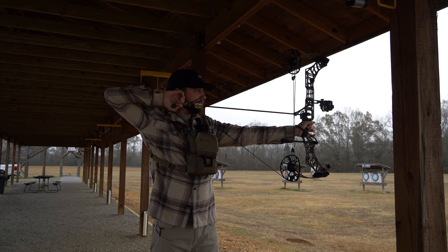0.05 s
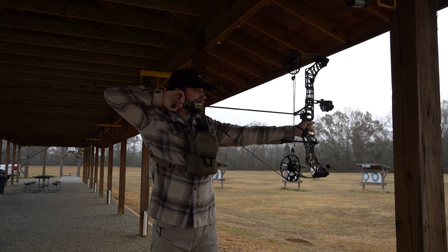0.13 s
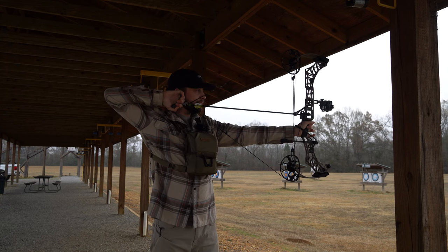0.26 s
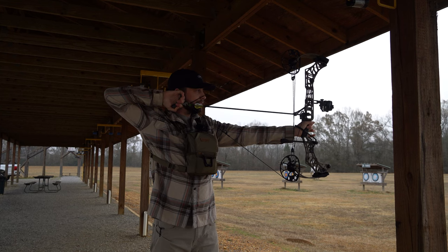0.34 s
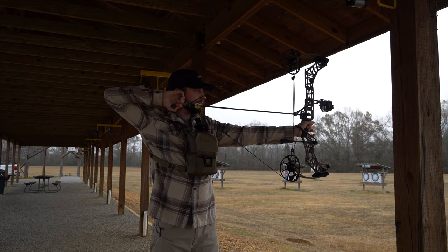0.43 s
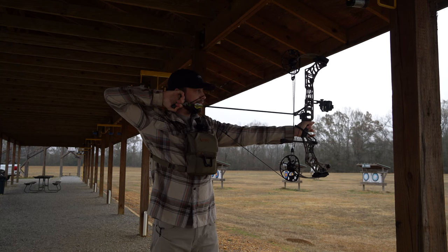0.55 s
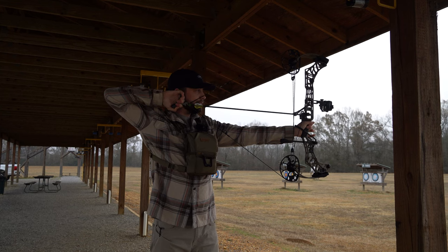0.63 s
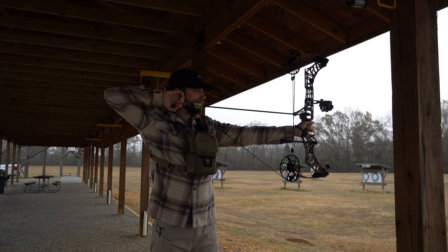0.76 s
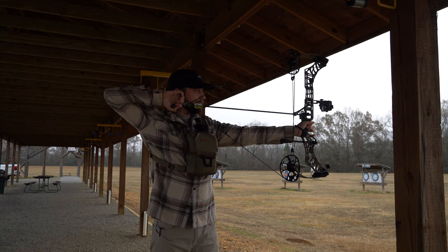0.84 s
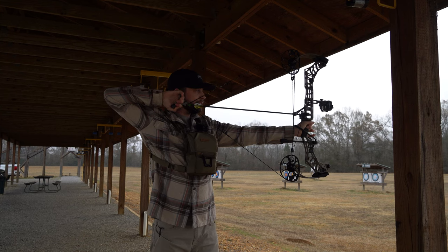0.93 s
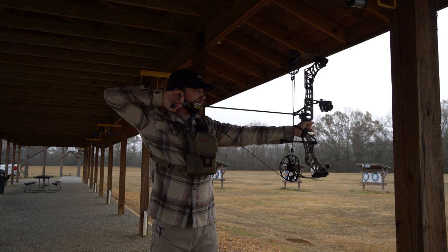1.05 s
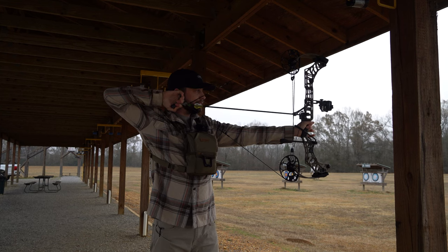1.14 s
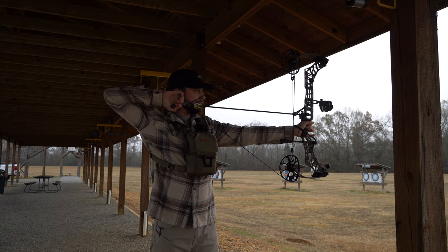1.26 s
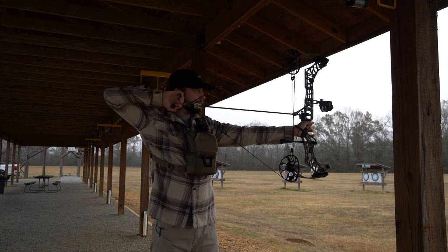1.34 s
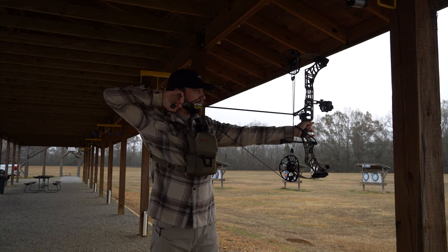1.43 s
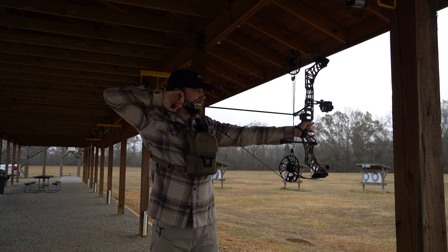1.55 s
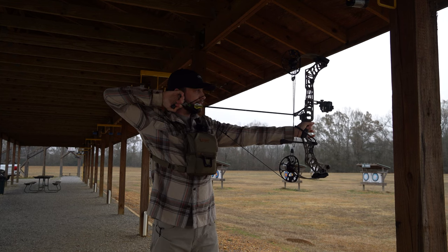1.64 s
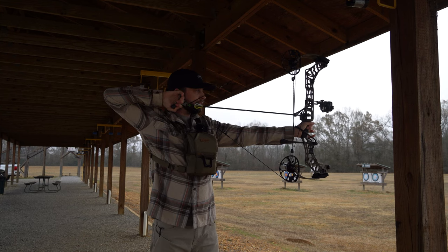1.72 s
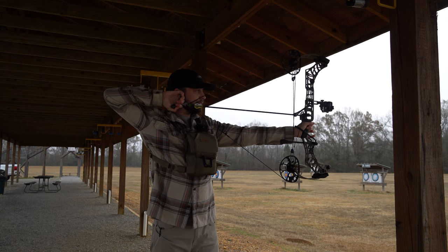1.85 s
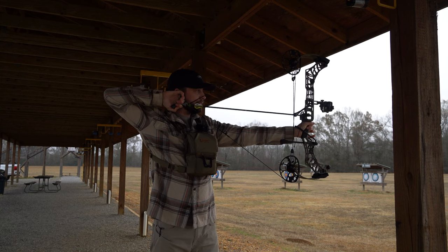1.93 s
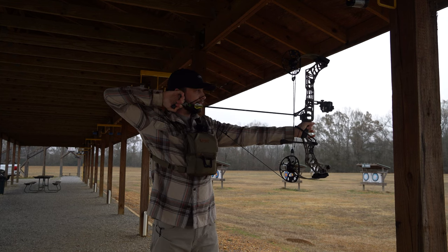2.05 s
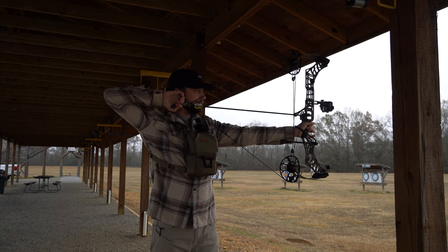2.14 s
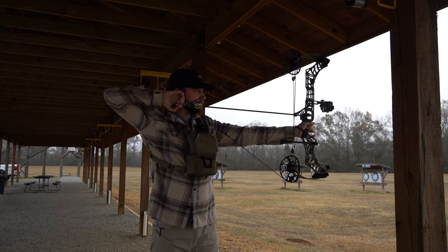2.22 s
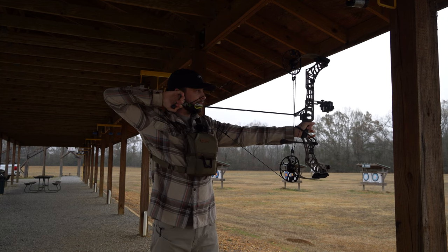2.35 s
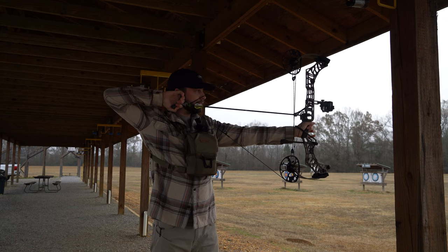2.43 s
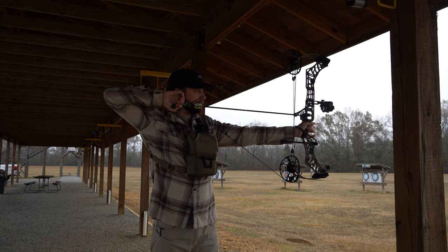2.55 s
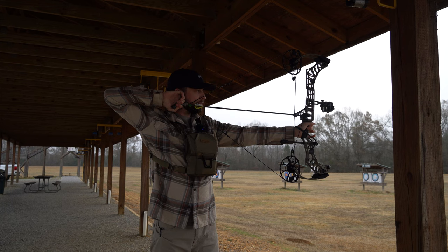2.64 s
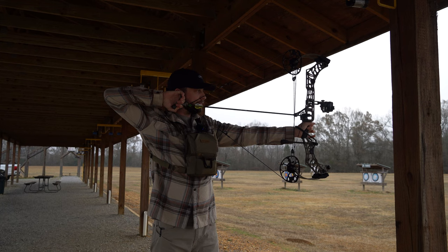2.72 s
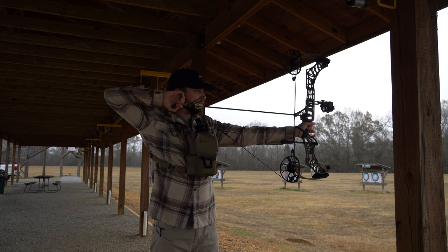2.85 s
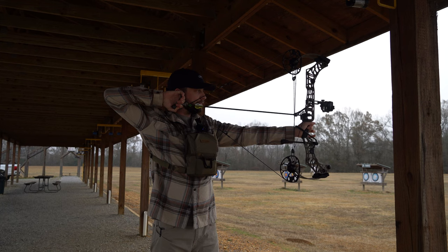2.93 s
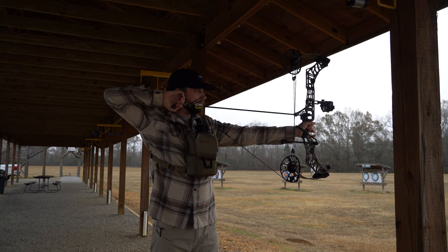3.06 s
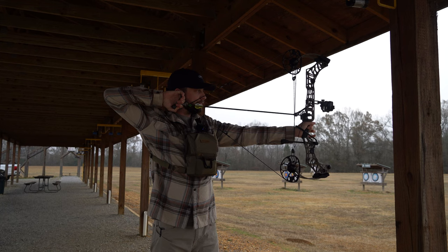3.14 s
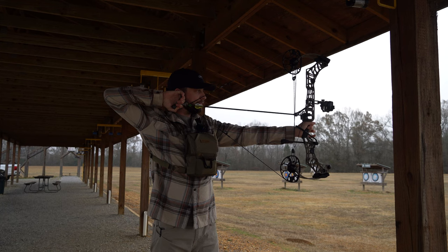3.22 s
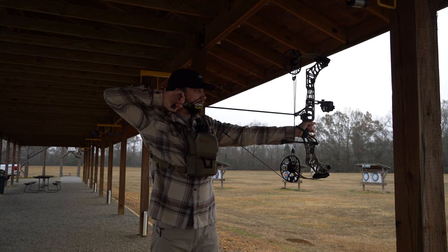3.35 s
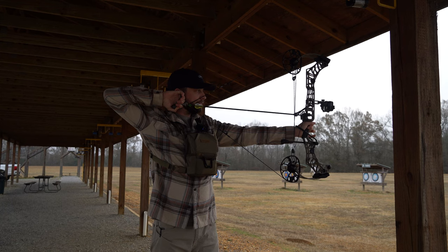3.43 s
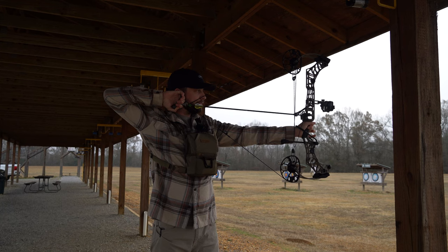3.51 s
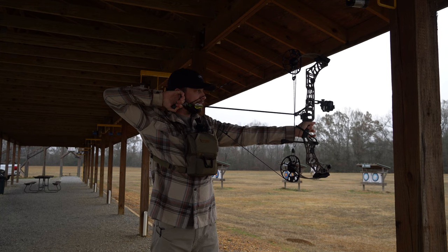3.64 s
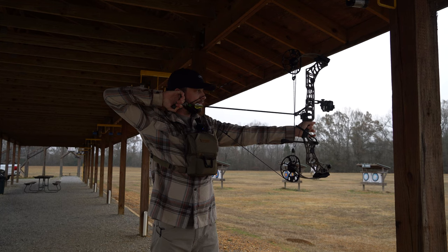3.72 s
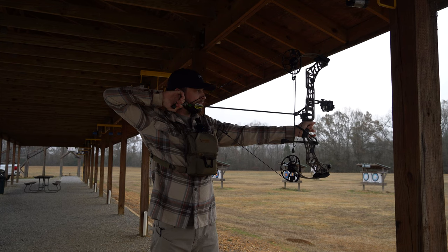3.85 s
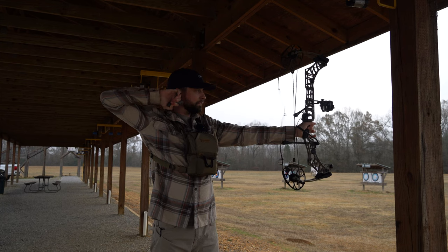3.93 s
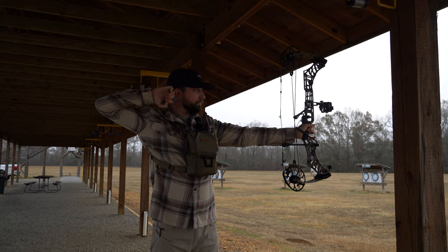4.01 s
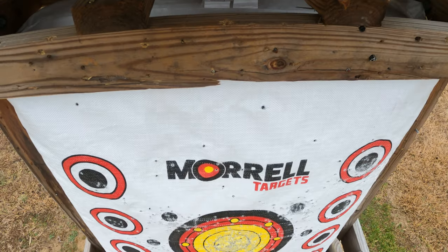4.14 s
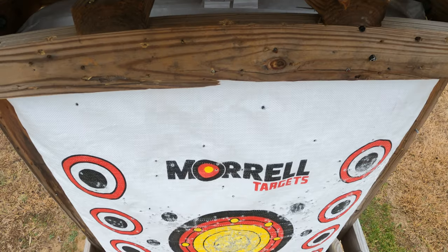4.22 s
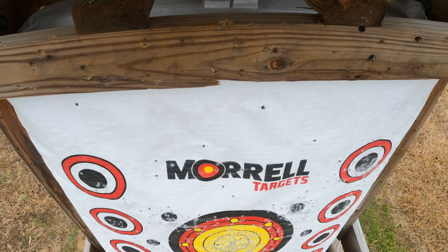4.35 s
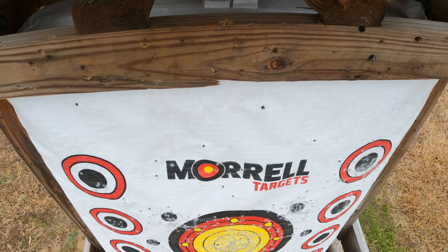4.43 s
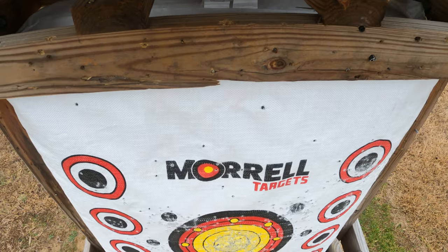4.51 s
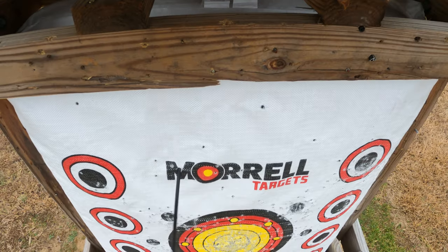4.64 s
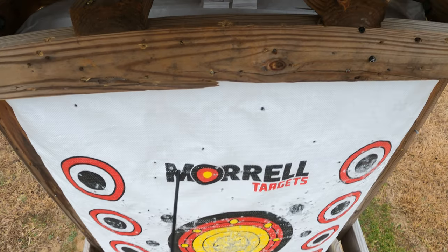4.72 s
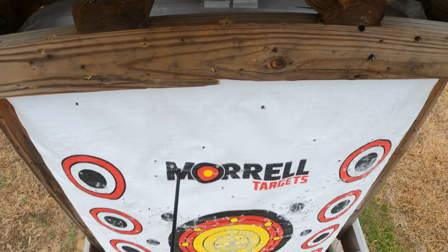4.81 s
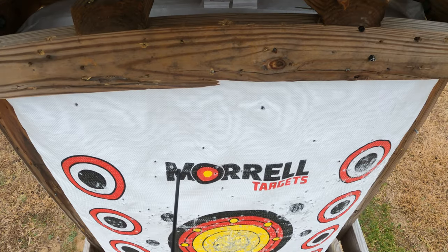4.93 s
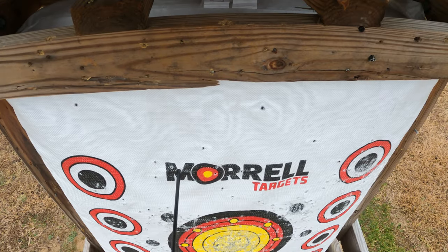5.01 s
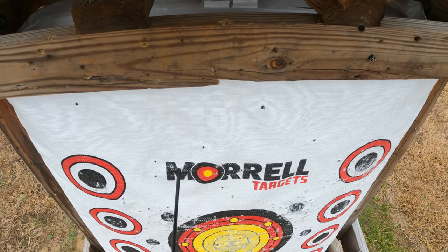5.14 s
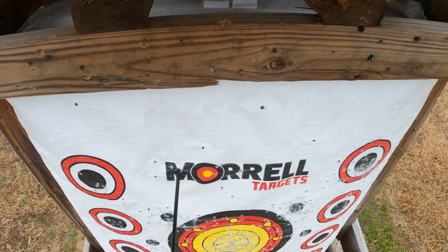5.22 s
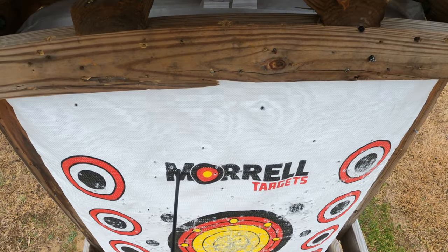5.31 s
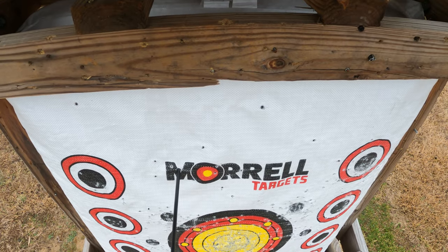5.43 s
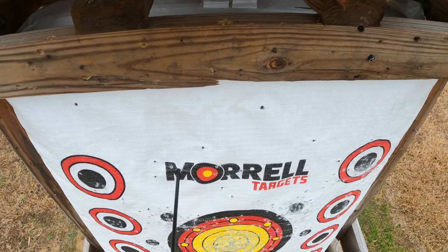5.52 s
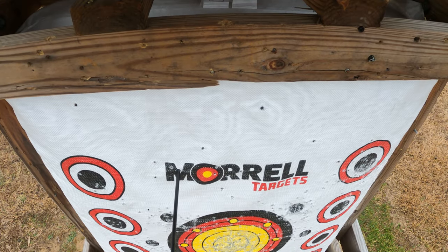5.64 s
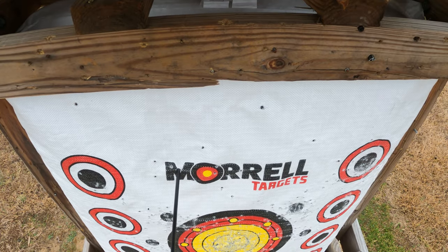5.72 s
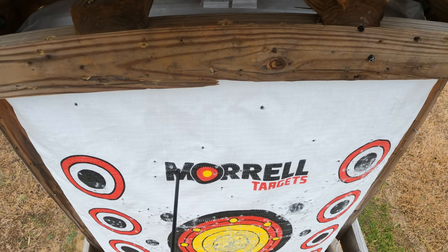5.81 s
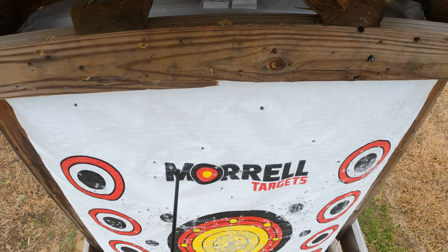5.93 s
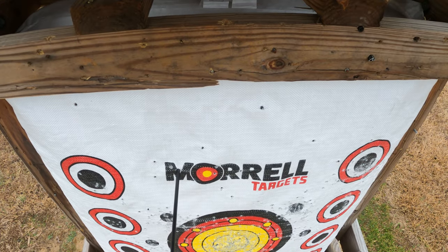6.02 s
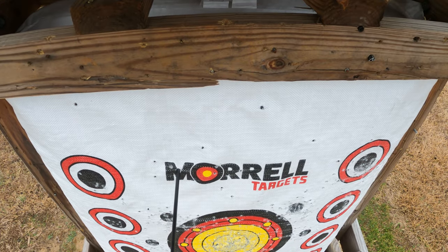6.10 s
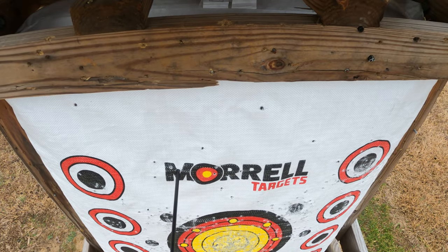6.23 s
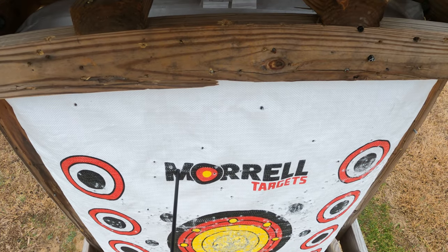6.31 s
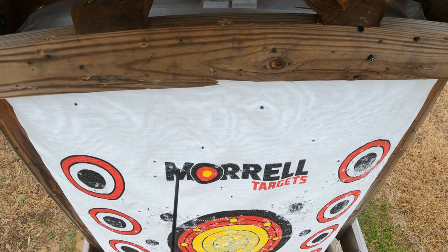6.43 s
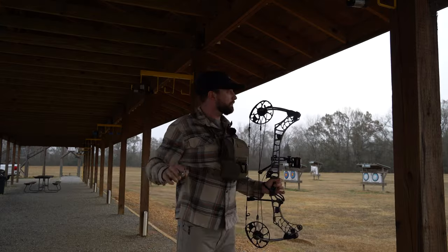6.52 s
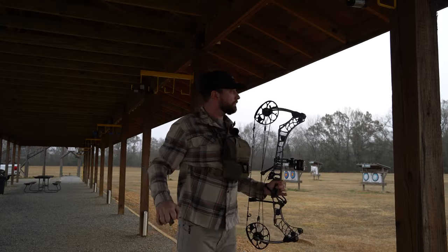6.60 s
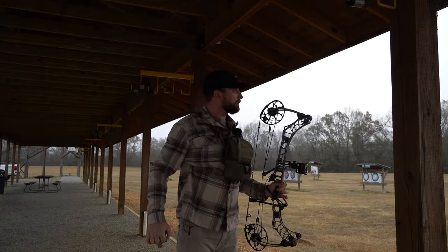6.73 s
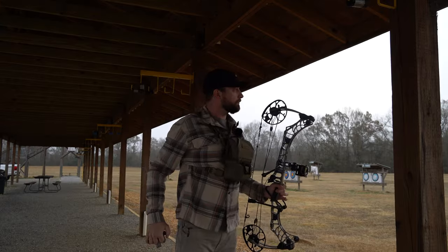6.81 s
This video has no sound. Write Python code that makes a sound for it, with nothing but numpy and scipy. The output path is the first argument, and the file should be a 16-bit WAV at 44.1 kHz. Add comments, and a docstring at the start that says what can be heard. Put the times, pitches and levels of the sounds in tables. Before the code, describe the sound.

Under an open shelter a compound bow snaps and rings; moments later an arrow hisses close and cracks loudly into a foam target, leaving ducked, recovering background.

```python
"""A compound bow is shot from under a wooden shelter at an outdoor range, over distant traffic and faint whistles.
After a tick at full draw, the release snaps, the string slams home and the bow rings: decaying noise and modes.
The hit returns faintly from down the field. A microphone at the target then hears the far shot, the arrow hissing
in and its crack into the foam; its gain control ducks and slowly recovers. Meanwhile cloth rustles and loose parts
rattle; last, a thin squeak, a dull bump and more faint whistles. Both microphones are mixed to mono."""
import sys
import numpy as np
from scipy import signal
from scipy.fft import rfft, irfft
from scipy.io import wavfile
from scipy.ndimage import uniform_filter1d

SR = 44100
rng = np.random.default_rng(int(sys.argv[2]) if len(sys.argv) > 2 else 0)


def master(y):
    """Save y as 16-bit WAV."""
    cut = np.clip(np.atleast_2d(y).T, -1, 1)
    pcm = np.round(cut * 32767)  # scale
    wavfile.write(sys.argv[1], SR, pcm.astype(np.int16))


N = 302702
TIME = np.arange(N) / SR  # seconds

# Spectrum of the string and limbs, for stroke and slam. Each row: frequency in Hz, relative gain in dB.
SLAM_COLOUR = [(40, -24), (100, -4), (230, 0), (420, 1), (620, -5.5), (850, -3), (1300, -5.5), (2000, -12),
               (3000, -21), (7000, -20), (10000, -28.5), (16000, -38)]


def undb(db):
    """Decibels are logarithmic: 20 dB is a tenfold amplitude."""
    return 10 ** (np.asarray(db) / 20)


def curve(rows, axis=1):
    """Linear interpolation joins one column of a table in time."""
    rows = np.array(rows)
    return np.interp(TIME, rows[:, 0], rows[:, axis])


def fade(t, t60):
    """Exponential damping: the amplitude falls by 60 dB in t60 seconds."""
    return np.exp(-np.log(1000) * t / t60)


def swell(start_s, length_s, rise, fall):
    """Linear attack, hold and release; rise and fall are shares of the length."""
    age = (TIME - start_s) / length_s
    return np.clip(np.minimum(age / rise, (1 - age) / fall), 0, 1)


def white_noise():
    """Independent Gaussian samples hold equal power at all frequencies."""
    return rng.standard_normal(N)


def colour(x, points):
    """Minimum-phase filter through (Hz, dB) points, of unit energy so that white noise keeps its level."""
    size = 2 ** 13
    hz, db = np.transpose(points)
    bins_hz = np.arange(size // 2 + 1) * SR / size
    gain = undb(np.interp(np.log(bins_hz + 1), np.log(hz), db))
    # folding the cepstrum onto positive times makes the response causal
    cepstrum = irfft(np.log(gain))
    cepstrum[1:size // 2] *= 2
    cepstrum[size // 2 + 1:] = 0
    response = irfft(np.exp(rfft(cepstrum)))
    return signal.oaconvolve(x, response / np.linalg.norm(response))[:N]


def walk(rate):
    """Low-passed random steps, about rate of them per second, with unit standard deviation."""
    k = int(SR / rate)
    steps = np.repeat(rng.standard_normal(N // k + 1), k)[:N]
    smooth = uniform_filter1d(uniform_filter1d(steps, k), k)
    return smooth / smooth.std()


def wavering_tone(pitch):
    """Frequency modulation: the phase is the running sum of the pitch in Hz."""
    return np.sin(2 * np.pi * np.cumsum(pitch) / SR)


def bursts(rows, points):
    """Impact noise: each contact is a dense crackle of equal clicks under exponential damping."""
    out, t = np.zeros(N), TIME[:SR // 2]
    for s, db, t60 in rows:
        start = int(s * SR)
        clicks = np.sign(rng.standard_normal(len(t)))
        out[start:start + len(t)] += undb(db) * fade(t, t60) * clicks
    return colour(out, points)


def ring(at_s, modes, db, push_s):
    """Modal superposition: damped sines of alternating polarity build up under a push of time constant push_s."""
    out, t, start = np.zeros(N), TIME[:SR // 2], int(at_s * SR)
    tone = np.zeros(len(t))
    for k, (hz, mode_db, t60) in enumerate(modes):
        tone += (-1) ** k * undb(mode_db) * fade(t, t60) * np.sin(2 * np.pi * hz * t)
    out[start:start + len(t)] = undb(db) * tone * (1 - np.exp(-t / push_s))
    return out


def knock(at_s, db, spread, points):
    """All-pass dispersion: the struck body holds some bands of one sharp blow back briefly."""
    click = np.zeros(N)
    click[int(at_s * SR)] = undb(db)
    for hz, width in spread:
        # subtracting a resonance twice turns the phase and keeps the spectrum
        resonance = signal.lfilter(*signal.iirpeak(hz, hz / width, fs=SR), click + 1e-18)
        click = click - 2 * resonance
    return colour(click, points)


def whistles(rows):
    """Frequency modulation: fast random scatter turns a gliding tone into a hissing trill."""
    out = np.zeros(N)
    for s, length, hz, glide, scatter, db, rise in rows:
        pitch = hz + glide * np.clip(TIME - s, 0, length) + scatter * walk(1100)
        tone = wavering_tone(pitch) * undb(2.5 * walk(120))
        out += undb(db) * tone * swell(s, length, rise=rise, fall=.4)
    return out


def traffic(points, low_db, high_db, split_hz):
    """Band splitting of distant road noise: engine rumble and tyre roar waver independently."""
    noise = colour(white_noise(), points)
    low_pass = signal.butter(2, split_hz, fs=SR, output="sos")
    rumble = signal.sosfiltfilt(low_pass, noise)
    roar = noise - rumble
    return rumble * undb(low_db * walk(14)) + roar * undb(high_db * walk(5.01))


def shelter_traffic():
    """Broadband background under the roof, its level drifting steadily down."""
    # Each row: frequency in Hz, relative gain in dB.
    air_colour = [(15, -60), (25, -35), (78, -7.5), (108, -1.5), (170, -6), (223, -13), (263, -13),
                  (293, -19.5), (354, -14), (591, -11), (720, -8.5), (988, -7.5), (1100, -12),
                  (1230, -12.5), (1650, -24), (3080, -34.5), (7500, -52.5), (12500, -58.5), (16000, -70)]
    start_db, drift_db_per_s = -53.5, -0.18
    level = undb(start_db + drift_db_per_s * TIME)
    return traffic(air_colour, low_db=1.2, high_db=0.5, split_hz=210) * level


def birds():
    """Faint frequency-modulated whistles and trills, likely birds in the tree line."""
    # Each row: start in seconds, length in seconds, pitch in Hz, glide in Hz per second,
    # pitch scatter in Hz, mean level in dB, share of the length spent rising.
    notes = [(.19, .06, 3200, 0, 200, -75, .1), (.34, .08, 4570, 0, 30, -83, .1),
             (1.005, 0.061, 4700, 3000, 220, -75, .2), (6.56, .13, 4490, 700, 55, -76, .15),
             (6.69, .24, 4200, -3000, 130, -75, .06)]
    return whistles(notes)


def tick():
    """Modal ringing of a small tick at full draw."""
    # Each row: frequency in Hz, relative level in dB, decay by 60 dB in seconds.
    tick_modes = [(4280, 0, 0.018), (4550, -8, .015), (5900, -17, .012), (9500, -10, 0.012),
                  (13800, -28, .012)]
    return ring(0.631, tick_modes, db=-42, push_s=0.00064)


def far_engine():
    """Filtered low-frequency noise: a far engine swells into the traffic and fades."""
    # Each row: frequency in Hz, relative gain in dB.
    rumble_colour = [(20, -30), (55, -12.5), (90, 0.5), (125, -1), (190, -18), (500, -50), (2000, -80)]
    return undb(-61.5) * colour(white_noise(), rumble_colour) * swell(2.8, 4.5, rise=.12, fall=.15)


def release():
    """Impact noise of the release jaw and cams, then of the arrow rest as it drops."""
    # Release jaw and cams. Each row: start in seconds, level in dB, decay by 60 dB in seconds.
    snaps = [(3.9808, -37.5, .01), (3.9823, -15.5, .006), (3.9832, -7.5, .007), (3.9852, -18, .01),
             (3.9864, -15, .006), (3.992, -35, .03), (4.0068, -34, .03)]
    # Each row: frequency in Hz, relative gain in dB.
    snap_colour = [(40, -18), (100, -5), (328, -5.5), (558, -13.5), (1280, -14.5), (1480, -12.5),
                   (3200, -11), (4050, -2), (5100, -6.5), (5850, -11), (6350, -1), (7400, -1), (8640, -13),
                   (9410, -4.5), (10700, -17), (14100, -13), (16000, -25)]
    # Arrow rest. Each row: start in seconds, level in dB, decay by 60 dB in seconds.
    rest_clicks = [(3.993, -21.5, .01), (3.9958, -32, .04)]
    # Each row: frequency in Hz, relative gain in dB.
    rest_colour = [(1000, -25), (3000, -11), (5200, -12), (7300, 1), (9400, 0), (11000, -8), (14000, -8),
                   (16000, -20)]
    return bursts(snaps, snap_colour) + bursts(rest_clicks, rest_colour)


def string_stroke():
    """Flow noise: the string whooshes forward for 33 ms."""
    return undb(-50) * colour(white_noise(), SLAM_COLOUR) * swell(3.984, 0.033, rise=.15, fall=.15)


def string_slam():
    """Impact and resonance: the string hits its stop, the limbs rebound and the bow's modes ring."""
    # Each row: start in seconds, level in dB, decay by 60 dB in seconds.
    slams = [(4.007, -32, .03), (4.0108, -18.5, .025), (4.0185, -21.5, 0.04), (4.03, -34, .14)]
    # Bands that the limbs hold back briefly. Each row: centre in Hz, width in Hz.
    limb_spread = [(300, 400), (750, 600), (1500, 900)]
    # Riser, limbs and string. Each row: frequency in Hz, relative level in dB, decay by 60 dB in seconds.
    bow_modes = [(125, -17, .05), (254, 13, 0.025), (370.4, 1.5, .15), (412, -4.5, 0.14), (440, 5, .035),
                 (549, -4.5, .14), (657, -7, .1), (700, -5, 0.13), (804, -6.5, .12), (956, -11, .16),
                 (1157, -11, .15), (1270, -11, .12), (1450, -3, .042), (1600, -16, .15), (1873, -7.5, 0.19),
                 (1935, -9, .06), (2134, -13, .1), (2363, -22, .17), (4312, -24, .15), (5076, -23, .13),
                 (7047, -18.5, .12)]
    blow = knock(4.0112, 1.5, limb_spread, SLAM_COLOUR)
    return blow + bursts(slams, SLAM_COLOUR) + ring(4.0118, bow_modes, db=-24.5, push_s=.0015)


def fittings():
    """Sympathetic vibration: after the slam, cables and fittings buzz and the metal rings."""
    # Each row: start in seconds, level in dB, decay by 60 dB in seconds.
    buzzes = [(4.0112, -27, .02), (4.015, -23, .016), (4.021, -36, .145)]
    # Each row: frequency in Hz, relative gain in dB.
    buzz_colour = [(1500, -22), (2800, -4), (4800, -4.5), (5500, -6), (6250, -2.5), (7200, -7), (9000, -14),
                   (9900, -10), (11000, -19), (13000, -18), (16000, -30)]
    # Metal on the riser. Each row: frequency in Hz, relative level in dB, decay by 60 dB in seconds.
    fitting_modes = [(6140, 2, 0.031), (6428, -12, .08), (7930, -18, .08), (9730, -19, .08)]
    return bursts(buzzes, buzz_colour) + ring(4.0142, fitting_modes, db=-21.5, push_s=.0006)


def soft_hiss():
    """Filtered noise: a faint mid-treble hiss swells and fades before the hit."""
    # Each row: frequency in Hz, relative gain in dB.
    hiss_colour = [(1000, -25), (2400, -5), (3400, 0), (5200, -6), (7000, -22), (12000, -45)]
    return undb(-52) * colour(white_noise(), hiss_colour) * swell(4.0, .7, rise=.3, fall=.5)


def cloth():
    """Friction noise: the archer's clothes rub out a grainy hiss as he lowers the bow."""
    # Each row: start in seconds, length in seconds, level in dB, centre in Hz,
    # added fall-off from the centre in dB per octave, graininess in dB.
    rustles = [(4.02, .25, -71.5, 4500, 4, 2), (4.7, 0.44, -72, 6500, 3, 1.5),
               (4.81, 0.38, -67, 2000, 7, 2), (4.97, .52, -74.5, 8000, 7, 1),
               (5.11, 0.21, -74.5, 9000, 40, 1.5), (6.339, .04, -68, 5500, 6, 2),
               (6.592, .016, -78, 9000, 5, 2), (6.708, 0.29, -67, 10000, 6, 1)]
    # Each row: frequency in Hz, relative gain in dB before the added fall-off.
    rustle_colour = [(1000, -13), (2500, -3.5), (4500, 7), (6500, -3.5), (9000, -4.5), (12000, -15),
                     (16000, -30)]
    out = np.zeros(N)
    for s, length, db, centre, falloff, grain in rustles:
        points = [(hz, g - falloff * abs(np.log2(hz / centre))) for hz, g in rustle_colour]
        rub = white_noise() * undb(grain * walk(110))
        out += undb(db) * colour(rub, points) * swell(s, length, rise=.3, fall=0.37)
    return out


def field_traffic():
    """Broadband background out at the target, with wavering rumble and roar."""
    # Each row: frequency in Hz, relative gain in dB.
    air_colour = [(25, -25), (55, -10), (90, 2), (122, 5), (165, -2.5), (300, -8), (500, -9), (1000, -9),
                  (1700, -10.3), (2400, -20.5), (3600, -25.5), (5500, -38), (8000, -53), (12500, -66),
                  (15000, -80)]
    return undb(-37.5) * traffic(air_colour, low_db=1.5, high_db=0.62, split_hz=250)


def far_hit():
    """Impact and resonance from across the field: crack, scatter, weak echo and the stand's boom."""
    # Each row: start in seconds, level in dB, decay by 60 dB in seconds.
    hits = [(4.2957, -16.5, 0.0085), (4.2969, -24, 0.0073), (4.299, -35, 0.13), (4.3173, -32, .006)]
    # Each row: frequency in Hz, relative gain in dB.
    hit_colour = [(100, -7.5), (230, 3), (370, -2), (560, 5.5), (780, -3), (1040, 4), (1300, -2), (1800, 3),
                  (3100, -7.5), (4800, -1.5), (7000, -11), (10000, -26), (16000, -37)]
    # Wooden stand. Each row: frequency in Hz, relative level in dB, decay by 60 dB in seconds.
    stand_modes = [(124, -2.5, .065), (234.6, 1.5, 0.043), (571, -2, .06), (1030, -9.5, .09),
                   (2288, -19, .09)]
    return bursts(hits, hit_colour) + ring(4.2972, stand_modes, db=-24, push_s=.0006)


def far_shot():
    """Impact noise of the release and the slam, heard from the target."""
    # Each row: start in seconds, level in dB, decay by 60 dB in seconds.
    shots = [(4.513, -34, 0.078), (4.5385, -29, .04), (4.5415, -24.5, 0.053), (4.556, -36.5, .26)]
    # Each row: frequency in Hz, relative gain in dB.
    shot_colour = [(150, -6.5), (340, 4), (530, 9), (750, -2), (1150, 4), (1500, -2.5), (1960, 0.5),
                   (4000, -7), (6300, -7.5), (9000, -31.5), (12000, -19.5), (14500, -54.5)]
    return bursts(shots, shot_colour)


def arrow(pass_s, stop_s, speed, miss_m, hiss_db, flutter_db):
    """Distance law: vane hiss grows with nearness; flutter and tones grow more steeply, until the foam stops them."""
    # Each row: frequency in Hz, relative gain in dB.
    vane_hiss = [(60, -25), (200, -13), (700, -7), (1500, -2), (2100, 0), (3400, 1), (4400, 0.5),
                 (5400, -3), (6500, -8.5), (8500, -15), (9400, -21), (10500, -17.5), (12300, -17),
                 (13200, -27), (14000, -52)]
    # Each row: frequency in Hz, relative gain in dB.
    vane_flutter = [(20, -45), (150, -26.5), (230, -6), (370, 2), (590, -2), (700, -0.5), (830, -2.5),
                    (1000, -9.5), (2500, -38), (16000, -65)]
    # Unsteady narrow tones in the arrow's approach, heard only close up.
    # Each row: pitch in Hz, pitch scatter in Hz, level in dB at the nearest point.
    approach_tones = [(228, 8, -17.5), (510, 15, -19), (620, 14.9, -21), (711, 12, -13), (817, 20, -20),
                      (1280, 19, -27), (1820, 20, -28), (2110, 20, -23), (4365, 30, -24.5),
                      (4645, 30, -26.5), (5025, 30, -25), (7100, 50, -39)]
    # Whistles on the way in. Each row: start in seconds, length in seconds, pitch in Hz,
    # glide in Hz per second, pitch scatter in Hz, mean level in dB, share of the length spent rising.
    flight_whistles = [(4.622, .075, 2850, 27000, 420, -45.5, 0.2), (4.58, .12, 6600, 0, 70, -57, .5)]
    # Vanes flap just before the hit. Each row: start in seconds, level in dB, decay by 60 dB in seconds.
    vane_flaps = [(4.7048, -19, .014)]

    # speed in metres per second; nearness is 1 at the closest point
    nearness = miss_m / np.hypot(miss_m, speed * (TIME - pass_s))
    fade_in = np.clip((TIME - 4.55) / .1, 0, 1)
    flying = fade_in * fade(np.maximum(TIME - stop_s, 0), .008)
    close = flying * nearness ** 2.7

    rush = white_noise() * undb(1.5 * walk(300)) * flying * nearness ** 1.42
    hiss = undb(hiss_db) * colour(rush, vane_hiss)
    flutter = undb(flutter_db) * colour(np.sign(white_noise()) * close, vane_flutter)
    tones = np.zeros(N)
    for hz, scatter, db in approach_tones:
        tones += undb(db) * wavering_tone(hz + scatter * walk(350))
    return hiss + whistles(flight_whistles) + tones * close + bursts(vane_flaps, vane_hiss) + flutter


def crack():
    """Impact and dispersion: the point bursts the taut cover and the shaft drives in after it."""
    # Bands that the cover holds back briefly. Each row: centre in Hz, width in Hz.
    cover_spread = [(1900, 1530), (3300, 1700), (5000, 2600), (8500, 4000)]
    # The shaft drives in. Each row: start in seconds, level in dB, decay by 60 dB in seconds.
    shaft_cracks = [(4.716, -5.5, .004), (4.7168, -15, .012), (4.72, -33.5, 0.08)]
    # Each row: frequency in Hz, relative gain in dB.
    crack_colour = [(20, -12), (70, -2), (230, 4), (700, 3), (1200, 5), (2000, 6.5), (3600, 4), (4900, 5.5),
                    (6500, -7.5), (9000, -11), (12000, -29.5), (16000, -40)]
    return knock(4.7156, 20.5, cover_spread, crack_colour) + bursts(shaft_cracks, crack_colour)


def thud():
    """Modal ringing: the cover slaps inward, of opposite sign, and the foam block and frame resound."""
    # Taut cover. Each row: frequency in Hz, relative level in dB, decay by 60 dB in seconds.
    cover_modes = [(660, -0.5, .008), (1350, -5, 0.0028)]
    # Foam block and frame. Each row: frequency in Hz, relative level in dB, decay by 60 dB in seconds.
    target_modes = [(159, -6.5, 0.12), (217, 3, .055), (525, -8, .035), (865, -14, .04), (120, -8, .06)]
    slap = ring(4.7154, cover_modes, db=-0.5, push_s=0.00022)
    return ring(4.716, target_modes, db=-2.0, push_s=0.0091) - slap


def rattle():
    """Repeated impact: small loose parts rattle after the shot."""
    # Each row: start in seconds, level in dB, decay by 60 dB in seconds.
    rattles = [(4.821, -58.5, .04), (4.855, -55, .045), (4.892, -59, .035), (4.918, -59, .04),
               (4.945, -55, .025), (4.975, -60, 0.038), (5.0, -53.5, .05), (5.011, -54, .05)]
    # Each row: frequency in Hz, relative gain in dB.
    rattle_colour = [(60, -10), (280, 5), (700, -4), (2000, 0), (3200, -3), (5200, 1), (6500, -5.5),
                     (8000, -19), (12000, -26), (16000, -35)]
    return bursts(rattles, rattle_colour)


def squeak_strand(rows):
    """Frequency and amplitude modulation: one unsteady gliding tone flutters in level."""
    pitch = curve(rows) * (1 + .011 * walk(900) + .005 * walk(70))
    level = undb(curve(rows, axis=2) + 3 * walk(60) - 0.5)
    start_s, end_s = rows[0][0], rows[-1][0]
    return wavering_tone(pitch) * level * swell(start_s, end_s - start_s, rise=.03, fall=0.028)


def squeak():
    """Superposition of two gliding strands in a thin squeak that rises and sinks."""
    # Upper strand. Each row: time in seconds, centre pitch in Hz, relative level in dB.
    high_strand = [(5.86, 9000, -92), (5.9, 10400, -86), (5.935, 10100, -86), (6.0, 12300, -81),
                   (6.035, 12400, -80), (6.1, 10100, -89), (6.14, 11500, -85), (6.24, 10200, -85),
                   (6.3, 9000, -92), (6.42, 9700, -88), (6.47, 8600, -90)]
    # Lower strand. Each row: time in seconds, centre pitch in Hz, relative level in dB.
    low_strand = [(5.93, 8400, -86), (5.96, 9500, -77), (6.015, 10900, -83), (6.1, 9000, -86),
                  (6.13, 10000, -83), (6.24, 9100, -83), (6.29, 8200, -77), (6.36, 8200, -79),
                  (6.42, 8550, -73), (6.475, 7300, -84)]
    return squeak_strand(low_strand) + squeak_strand(high_strand)


def bump():
    """Modal ringing in the bass: a dull bump at the target microphone."""
    # Each row: frequency in Hz, relative level in dB, decay by 60 dB in seconds.
    bump_modes = [(115, 0, .07), (165, -5, .04)]
    return ring(6.302, bump_modes, db=-26.5, push_s=.003)


def shelter(x, wet_db, t60_low, t60_high, bass_hz, split_hz, high_db, build_s):
    """Reverberation from roof and posts: bass escapes at the open sides and the treble dies first."""
    t, noise = TIME[:SR], rng.standard_normal(SR)
    low = signal.sosfilt(signal.butter(2, [bass_hz, split_hz], "band", fs=SR, output="sos"), noise)
    high = signal.sosfilt(signal.butter(2, split_hz, "high", fs=SR, output="sos"), noise)
    build_up = 1 - np.exp(-(t / build_s) ** 2)
    tail = (low * fade(t, t60_low) + undb(high_db) * high * fade(t, t60_high)) * build_up
    return x + undb(wet_db) * signal.oaconvolve(x, tail / np.linalg.norm(tail))[:N]


def gain_control(x):
    """Compression: sound over a threshold pulls the gain down within a range; each stage creeps back at its own rate."""
    # A slow and a quick stage. Each row: threshold in dB, range in dB, attack in seconds, release in dB per second.
    stages = [(-28, 15, 0.037, 6.5), (-20, 7, 0.033, 35)]
    # power averaged over about 10 ms
    power = signal.lfilter([100 / SR], [1, 100 / SR - 1], x ** 2)
    level_db = 10 * np.log10(power + 1e-12)
    cut_db = 0
    for threshold_db, range_db, attack_s, release_db_per_s in stages:
        # a running peak on a rising ramp falls at the release rate once the ramp is removed
        creep = release_db_per_s * TIME
        excess_db = np.clip(level_db - threshold_db, 0, range_db)
        held_db = np.maximum.accumulate(excess_db + creep) - creep
        pole = np.exp(-1 / (attack_s * SR))
        cut_db = cut_db + signal.lfilter([1 - pole], [1, -pole], held_db)
    return x * undb(-cut_db)


def shelter_microphone():
    """Superposition under the roof, close to the archer; only shot and hit excite the reverberation."""
    shot = release() + string_stroke() + string_slam() + fittings()
    near = shelter(shot + far_hit(), wet_db=-18.8, t60_low=.32, t60_high=.26,
                   bass_hz=260, split_hz=3000, high_db=-6.5, build_s=0.013)
    archer = tick() + cloth() + rattle() + squeak()
    return near + archer + birds() + shelter_traffic() + far_engine()


def target_microphone():
    """Overload: right above the target with its gain high, the crack clips before the gain control."""
    on_s, off_s = 4.1955, 6.535  # the microphone is heard only in between
    flight = arrow(pass_s=4.7135, stop_s=4.7155, speed=85, miss_m=.72, hiss_db=-24.5, flutter_db=-18)
    surroundings = field_traffic() + soft_hiss() + bump()
    overloaded = np.clip(surroundings + far_shot() + flight + crack() + thud(), -1.35, 1.35)
    return gain_control(overloaded) * (TIME > on_s) * (TIME < off_s)


def scene():
    """Superposition of both microphones, the same in each ear."""
    return np.tile(shelter_microphone() + target_microphone(), (2, 1))


def record(dry):
    """Clipping at full scale, then a steep elliptic low-pass."""
    top_hz = 15900
    low_pass = signal.ellip(8, .2, 70, top_hz, fs=SR, output="sos")
    return signal.sosfilt(low_pass, np.clip(dry, -1, 1))


dry = scene()
out = record(dry)
master(out)
```